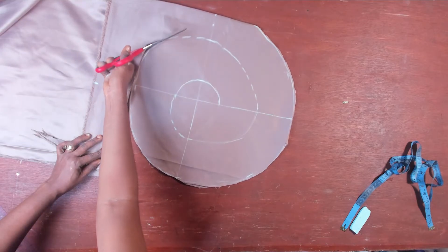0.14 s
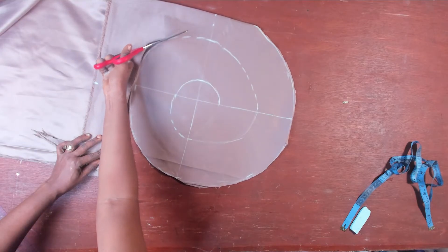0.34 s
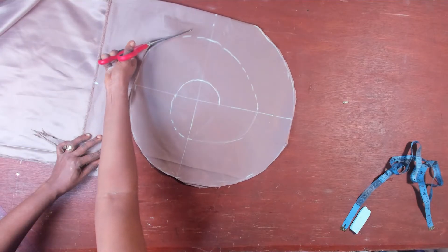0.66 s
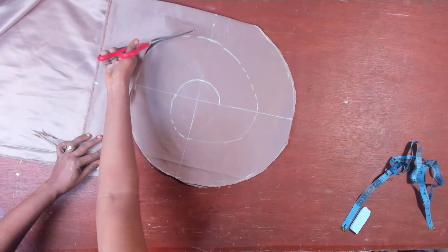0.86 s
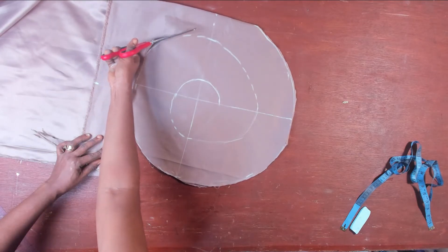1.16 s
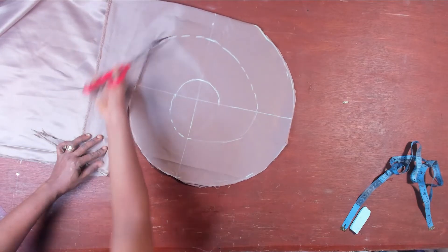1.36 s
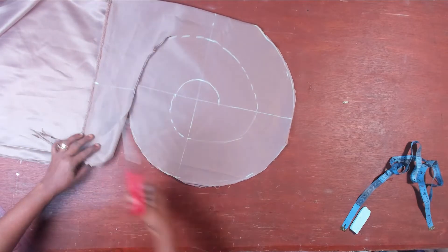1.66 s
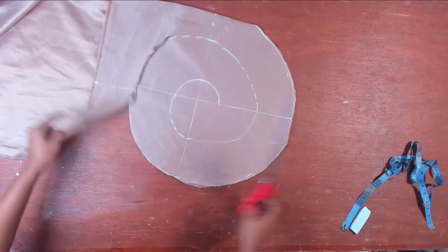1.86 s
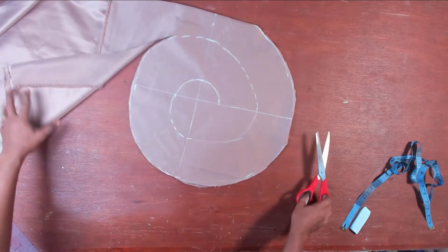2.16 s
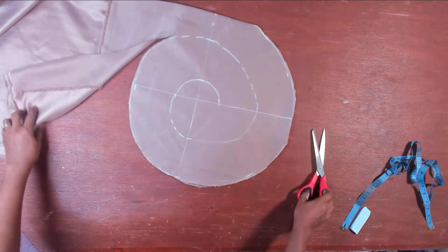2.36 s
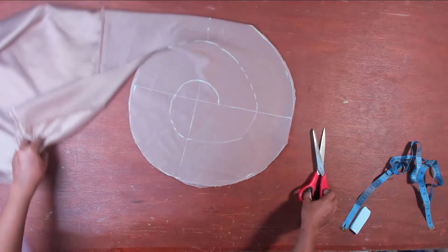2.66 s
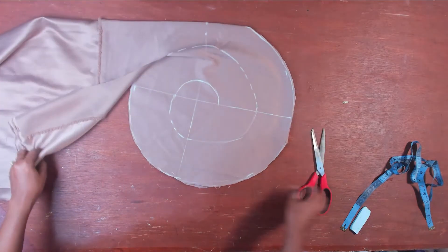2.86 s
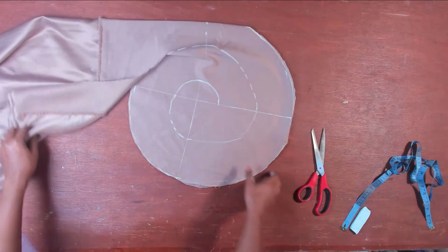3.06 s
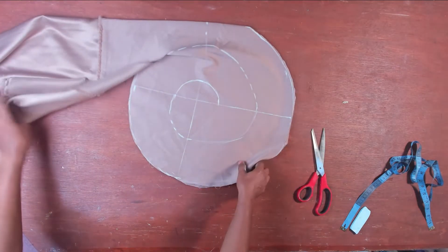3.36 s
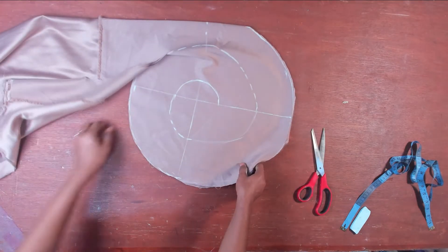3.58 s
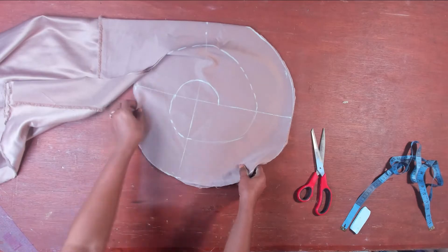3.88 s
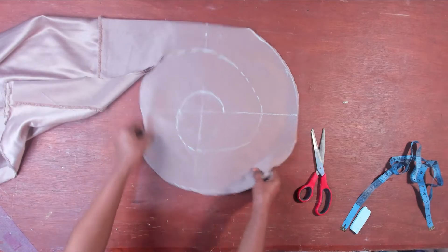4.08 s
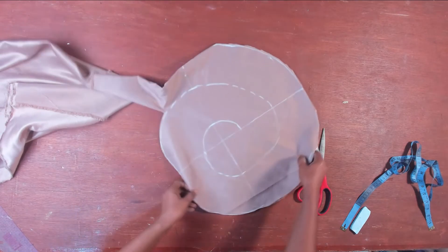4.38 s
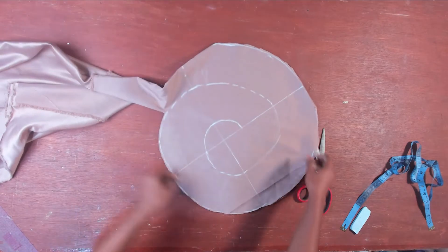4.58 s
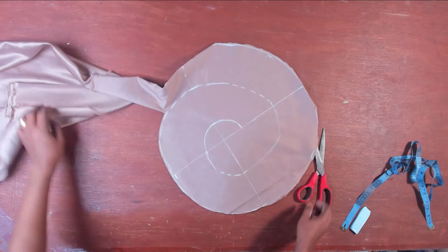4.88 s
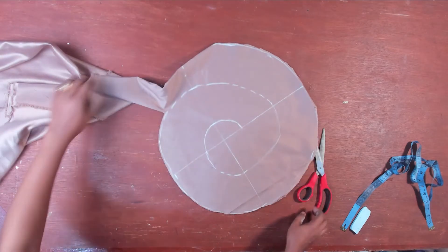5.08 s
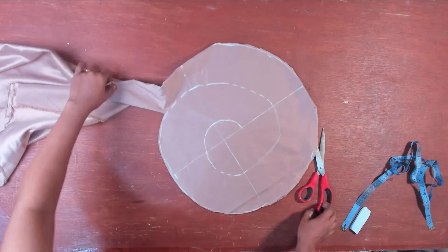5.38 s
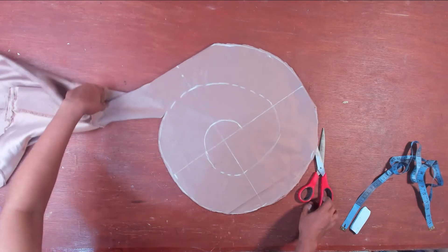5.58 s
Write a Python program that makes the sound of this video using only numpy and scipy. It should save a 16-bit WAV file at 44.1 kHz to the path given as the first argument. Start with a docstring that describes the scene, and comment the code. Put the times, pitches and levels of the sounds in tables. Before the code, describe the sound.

A close, dry mono view of a hollow wooden table in a quiet room with low hum, a very faint electrical buzz and deep table sway. Scissors cut cloth at about 0.05, 0.5 and 0.95 seconds: each snip is a short low woody thump with a gritty, metallic shearing edge, the first knock strongest. Around 1.15 the scissors draw back with a small scrape and hollow ring. At 1.5 a bright cloth hiss starts abruptly, swells and fades within roughly half a second, treble first. At 2.15 to 2.4 the scissors knock and chatter on the wood; at 2.65 to 2.75 comes the loudest cluster of heavy clunks with metal rattle. Small slides follow near 2.9 and 3.1, then a dull solid knock and thump at 3.45. Soft cloth rustles continue to about 4.3, then near silence, with tiny thumps and faint rustling from 5.1 and a light tap at 5.6.

```python
"""Scissors on a hollow wooden table snip three times through cloth and are drawn back; the cloth is swept
aside with a hiss, the scissors are laid down, knock and chatter on the wood, hands shift the cloth.
Random contact impulses excite damped modes of table and blades; friction and cloth are shaped noise.
Thumps are low damped sines, and the handle rings as narrow noise bands of gliding pitch.
A close microphone on the same table picks up its sway; a quiet room hums and faintly buzzes underneath."""
import sys
import numpy as np
from scipy import signal
from scipy.fft import rfft, irfft, next_fast_len
from scipy.io import wavfile
from scipy.ndimage import uniform_filter1d

SR = 44100
rng = np.random.default_rng(int(sys.argv[2]) if len(sys.argv) > 2 else 0)


def file_out(sig):
    """Save sig as 16-bit WAV at sys.argv[1]."""
    # one column per channel
    cols = np.atleast_2d(sig).T
    # limit, then scale
    lim = np.clip(cols, -1, 1)
    pcm = np.round(lim * 32767).astype(np.int16)
    wavfile.write(sys.argv[1], SR, pcm)


N = 252685  # samples

# Table levels are relative: the sources add their own trims. Tilts are in dB per octave.
# Spectrum of the room air: pitch_hz, density_db
AIR_SPECTRUM = [(29, -18), (50, 2.5), (75, -15.5), (125, -7.5), (193, -15.5), (239, -14.5), (458, -21),
                (674, -22), (922, -26.5), (1290, -26.5), (3300, -38.5), (13700, -51.5), (15800, -56)]
# Hum lines of the room: pitch_hz, level_db
HUM_LINES = [(113.0, -63), (156.1, -65), (242.2, -64), (1400, -81.5)]
# Harmonics two to five of the electrical whine: level_db
WHINE_LEVELS = [-87.5, -95, -91.5, -95]
# Slow sway of the table under the arms: time_s, level_db
SWAY_CURVE = [(0.0, -71), (0.06, -39), (0.38, -54.5), (0.7, -51), (0.92, -43), (0.99, -45), (2.57, -45.5),
              (2.62, -47), (2.71, -29.5), (3.25, -55), (3.5, -40), (3.57, -48), (4.88, -49.5), (5.27, -43),
              (5.67, -42), (5.73, -44.5)]
# Jolts that set a higher mode rocking: start_s, hold_s, level_db
ROCK_EVENTS = [(-0, 0.1, -34), (0.59, 0.059, -30), (1.04, .02, -41.5), (2.188, 0.14, -36),
               (2.69, 0.16, -28), (3.453, .02, -41), (5.234, .03, -56)]
# Blades closing on the cloth: start_s, closing_s, push_db, sharpness_db_per_octave,
# grind_db, hardness_db_per_octave, shear_db
SNIP_EVENTS = [(0.029, 0.066, -19, -3, -30, 0, -47), (0.526, 0.043, -19, -1.5, -28, -0.7, -46.5),
               (.938, 0.037, -18, 2, -27, 0.4, -43.5)]
# Scissors landing and chattering: start_s, blow_over_chatter_db, chatter_s, fall_db_per_s, push_db,
# sharpness_db_per_octave, grind_db, hardness_db_per_octave, rasp_db
LANDING_EVENTS = [(2.18, 10.5, 0.072, 248, -30, 8.5, -30, 4.5, -38),
                  (2.275, -15, 0.091, 600, -29, -7, -37, -1.5, -45),
                  (2.394, 6, 0.041, 252, -50, 19, -38.5, .1, -70),
                  (2.65, 1, 0.097, 201, -18.5, 4, -22, 3, -38.5),
                  (3.377, -3, 0.075, 455, -50, 2, -40.5, 2, -67),
                  (3.45, 12.5, 0.067, 218, -28, -1, -34.5, -3.5, -60.5)]
# Scissors and hands sliding on wood: start_s, rise_db_per_s, hold_s, fall_db_per_s, push_db,
# sharpness_db_per_octave, grind_db, hardness_db_per_octave, drag_db
SLIDE_EVENTS = [(0.227, 500, 0.015, 280, -55, -13, -44.5, -4.5, -76),
                (0.727, 330, 0.012, 330, -43, -9, -53.5, -1, -81),
                (1.163, 600, 0.088, 230.5, -42.5, 9, -32, 5, -54),
                (2.149, 2006, 0.034, 600, -24, -2.5, -37.5, -2.5, -64),
                (2.322, 242, 0.055, 400, -36, 5.5, -35.5, 7, -51),
                (2.631, 898, .012, 600, -34, -1, -46.5, 5, -66),
                (2.879, 696, 0.026, 227, -30, .1, -42, -1.7, -63),
                (3.078, 215, .015, 142, -43.5, 1.5, -44, 1.7, -72),
                (5.113, 500, .011, 160, -64, -2.5, -58, 3, -92),
                (5.584, 1200, .03, 130, -52, 2.5, -54, 4, -73)]
# Single contacts with the wood: start_s, level_db, pitch_hz, t60_s, crack_db, treble_db (both against level)
KNOCK_EVENTS = [(0.03, -20, 300, 0.1, -15, -16), (0.061, -8.5, 244, 0.023, -29, -42),
                (0.197, -40.5, 237, 0.037, -6.5, -33), (0.472, -47, 600, 0.02, -17, -28),
                (0.51, -26.5, 294, 0.29, -29, -31), (0.924, -27, 205, 0.054, -21, -34),
                (2.148, -24, 288, 0.05, -29, -27), (2.177, -4, 200, 0.028, -6, -9.5),
                (2.183, -21.5, 200, 0.2, -18, -27), (2.272, -28, 310, 0.071, -25, -9),
                (2.304, -20, 326, 0.063, -27, -10.5), (2.352, -43, 525, 0.04, -30, -24),
                (2.391, -17.5, 520, 0.03, -26, -34), (2.648, 1, 228, 0.026, -14.5, -23),
                (2.69, -5, 266, 0.056, -13, -22), (2.716, -6, 207, 0.035, -24, -43),
                (2.745, -24, 210, 0.048, -21, -57), (3.374, -34, 480, 0.049, -35, -41),
                (3.449, -3.5, 345, 0.019, -34, -36), (5.588, -50, 540, 0.035, -22, -26)]
# Low modes of the table top: pitch_hz, width_hz, level_db
BOOM_MODES = [(47, 6.9, -7), (66, 6.5, 1), (90, 19, -5), (115.7, 8.15, 4), (155.4, 7.9, -9.5),
              (188.8, 10.2, 0.5), (226.5, 48.5, -6.5)]
# Upper modes of the table top: pitch_hz, width_hz, level_db
WOOD_MODES = [(292, 53.4, 2), (382, 52.6, 4), (466, 108, -4), (538, 36.7, 4), (575.5, 27, -1.5),
              (620, 21.5, -1), (692.6, 34.5, -5), (772, 52, -3), (864, 35, -9.5), (947, 39, -6),
              (1079, 61, -9), (1230, 78, -12.5), (1432, 100, -15), (1644, 170, -20), (2084, 190, -23),
              (2333, 18, -17.5), (2550, 220, -29.5), (3070, 530, -35.5), (4040, 1400, -40.5)]
# Soft thumps of a hand or wrist: start_s, level_db, pitch_hz, t60_s
THUMP_EVENTS = [(0.009, -20.5, 73, 0.31), (0.534, -19.5, 71, 0.14), (0.931, -18, 92.5, 0.24),
                (1.428, -44.5, 62, 0.23), (2.091, -33.5, 51, 0.54), (2.139, -19, 49.5, 0.26),
                (2.281, -24, 95.5, 0.22), (3.456, -10.5, 65.6, 0.11), (3.692, -38, 49.4, 0.36),
                (5.1, -50.5, 48.4, 0.22), (5.239, -38, 68.5, 0.35)]
# Modes of the blades: pitch_hz, width_hz, level_db
BLADE_MODES = [(2130, 150, 1), (2300, 140, 14.5), (2660, 125, 13), (3640, 120, -9), (4630, 200, 4),
               (4400, 250, -5), (4620, 430, 12), (5020, 37, 17), (6300, 74, 4), (6460, 71, -1),
               (7570, 75, 2), (8460, 150, -16), (10400, 50, -9), (12630, 60, -20)]
# Spectrum of the shearing edges: pitch_hz, density_db
SHEAR_SPECTRUM = [(1880, -50), (3200, -17.5), (4020, -3.5), (4750, -13.5), (5530, -14), (7040, -17.5),
                  (7630, -14.5), (9200, -20), (11700, -19.5), (15800, -35)]
# Spectrum of sliding friction: pitch_hz, density_db
DRAG_SPECTRUM = [(1180, -25), (2000, -26), (3330, -37), (3990, -6), (5950, -12.5), (9490, -9.5),
                 (12100, -18), (15800, -42)]
# Spectrum of chattering metal: pitch_hz, density_db
RASP_SPECTRUM = [(1180, -3), (2000, 0.5), (2240, -43), (2420, -3), (3930, -8.5), (4750, -10.5), (5950, -9),
                 (9820, -20.5), (15800, -29)]
# Hollow handle ringing as it slides or rocks: start_s, hold_s, start_db, end_db, start_hz, end_hz
HANDLE_EVENTS = [(1.15, 0.088, -39, -49.5, 1325, 1318), (1.19, 0.062, -37, -29, 360, 345.5),
                 (2.274, 0.087, -33, -45.5, 1490, 1493), (3.377, 0.07, -45.5, -60, 2294, 2340),
                 (3.378, 0.059, -28.5, -45, 513, 536), (3.377, 0.039, -58, -61, 2865, 2940),
                 (3.486, 0.098, -43, -59, 577, 535)]
# Spectrum of the swept cloth: pitch_hz, density_db
HISS_SPECTRUM = [(350, -45.5), (600, -17.5), (727, -24), (1110, -9.5), (1360, -27), (1590, -7), (1790, -13),
                 (2560, -8), (7440, -1), (12000, -3.5), (15800, -10)]
# Cloth lifted and turned: start_s, hold_s, broad_db, bright_db, bright_hz
RUSTLE_EVENTS = [(2.397, .23, -58, -62, 5900), (2.891, .04, -71, -67.5, 6560),
                 (3.079, .03, -64, -77.5, 5130), (3.49, 0.085, -60.5, -61, 5500),
                 (3.788, .04, -62.5, -63.5, 4550), (3.881, .03, -72.5, -68, 4900),
                 (4.01, .025, -68, -60, 5370), (4.123, 0.022, -72, -68.5, 4800), (4.2, .13, -65, -79, 5000),
                 (4.717, .025, -83, -81, 5200), (5.25, .04, -84, -76, 4900),
                 (5.347, 0.021, -76, -75.5, 5200), (5.434, .12, -72, -75, 5000)]
# Spectrum of the rustling cloth: pitch_hz, density_db
CLOTH_SPECTRUM = [(410, -31), (700, 5), (945, 1.5), (1080, 4.5), (1360, 4.5), (3100, -6.5), (4700, -6),
                  (7040, -7.5), (9140, -11.5), (15800, -13)]

AIR_DB = -54
BUZZ_PER_S, BUZZ_HISS_DB, WHINE_HZ = 105.6, -81, 2683
WHINE_DUTY, BUZZ_DUTY = 0.33, 0.25  # fractions of each buzz cycle
SWAY_HZ, ROCK_HZ = 26.5, 35.7
# Envelope rates in dB per s; a negative sag builds through the hold
ROCK_RISE, ROCK_FALL = 260, 112
SNIP_RISE, PUSH_SAG, PUSH_FALL = 700, 68, 247
GRIND_SAG, GRIND_FALL, SHEAR_SAG, SHEAR_FALL = -38, 226, -73, 333
LANDING_RISE, BLOW_FALL, CHATTER_SAG, RASP_SAG = 4900, 460, 36, 120
SLIDE_SAG = 91
HANDLE_RISE, HANDLE_FALL = 4200, 530
RUSTLE_RISE, RUSTLE_SAG, RUSTLE_FALL, BRIGHT_RISE, BRIGHT_FALL = 74, 33, 150, 560, 220
SOFTENING = 16  # dB per octave of hardness lost per s as a contact lets go
RASP_FASTER = 1.5  # fall of the rasp relative to that of the grind
SWEEP_S, SWEEP_SWELL_S = 1.499, 0.013
SWEEP_DB, SWEEP_TREBLE_DB, SWEEP_SPLIT_HZ = -28, 3.9, 9800
SWEEP_RISE, SWEEP_SWELL = 1700, 450  # dB per s
# Loss in dB after one second, its power of time, and extra treble loss in dB per s
SWEEP_LOSS_DB, SWEEP_CURVE, TREBLE_LOSS = 301, 1.69, 79
CUTOFF_HZ = 16120


def amp(db):
    """Decibel law: level to amplitude ratio."""
    return 10 ** (np.asarray(db) / 20)


def rms_one(x):
    """Normalisation to unit rms."""
    return x / np.sqrt(np.mean(x ** 2) + 1e-20)


def grains(per_s, spread_db):
    """Impulse noise: random clicks of uneven size and sign; rms 1."""
    sizes = amp(spread_db * np.minimum(rng.exponential(1, N), 4))
    signs = rng.choice([-1, 1], N)
    present = rng.random(N) < per_s / SR
    return rms_one(sizes * signs * present)


def drift(rate):
    """Slow random fluctuation: noise through a double real pole; rms 1."""
    r = np.exp(-2 * np.pi * rate / SR)
    noise = rng.standard_normal(N + SR)
    return rms_one(signal.lfilter([1], [1, -2 * r, r * r], noise)[SR:])  # first second lets it settle


def low_pass(x, hz):
    """Fourth-order low-pass filtering."""
    return signal.sosfilt(signal.butter(4, hz, fs=SR, output="sos"), x)


def band_pass(x, low_hz, high_hz):
    """Band limitation by Butterworth filtering."""
    return signal.sosfilt(signal.butter(3, [low_hz, high_hz], "band", fs=SR, output="sos"), x)


def colour(x, spectrum):
    """Spectral shaping: 24 dB/octave steeper below the first point, flat above the last; unit rms gain."""
    size = next_fast_len(N + 4096)
    hz = np.arange(size // 2 + 1) * SR / size + 1
    at, db = np.transpose(spectrum)
    octaves_below = np.maximum(np.log2(at[0] / hz), 0)
    shape = amp(np.interp(np.log(hz), np.log(at), db) - 24 * octaves_below)
    return irfft(rfft(x, size) * rms_one(shape), size)[:N]


def resonate(x, hz, width_hz):
    """Damped resonance: a two-pole filter with about unit gain at its peak."""
    r = np.exp(-np.pi * width_hz / SR)
    feed = np.array([1, 0, -1]) * (1 - r * r) / 2
    return signal.lfilter(feed, [1, -2 * r * np.cos(2 * np.pi * hz / SR), r * r], x + 1e-18)


def body(x, modes, tilt_db=0, pivot_hz=1000):
    """Modal superposition with alternating signs; harder contact tilts the drive to upper modes."""
    power, out = 0, 0
    for k, (hz, width_hz, db) in enumerate(modes):
        drive = x * amp(tilt_db * np.log2(hz / pivot_hz))
        out = out + (-1) ** k * amp(db) * resonate(drive, hz, width_hz)
        power += amp(2 * db) * np.pi * width_hz / SR
    return out / np.sqrt(power)


def moving_band(centre_hz, width_hz):
    """Amplitude modulation: low-passed noise on a carrier that follows a centre curve; rms 1."""
    band = low_pass(rng.standard_normal(N), width_hz / 2)
    return rms_one(band * np.sin(2 * np.pi * np.cumsum(centre_hz) / SR))


def strokes(s, db, rise, hold, sag, fall):
    """Exponential envelopes, one per event: climb to s, sag through the hold, fall; rates in dB per s."""
    s, db, rise, hold, sag, fall = (np.reshape(v, (-1, 1)) for v in (s, db, rise, hold, sag, fall))
    t = np.arange(N) / SR - s
    before = np.abs(rise) * np.maximum(-t, 0)
    during = sag * np.clip(t, 0, hold)
    after = np.abs(fall) * np.maximum(t - hold, 0)
    return amp(db - np.minimum(before + during + after, 150))


def prevailing(envelopes, values):
    """Weighted mean: at each moment the strongest events count most."""
    weighted = np.reshape(values, (len(envelopes), -1)) * envelopes
    return weighted.sum(axis=0) / envelopes.sum(axis=0)


def wobble(hz):
    """Random phase and amplitude modulation of a sine, giving a slightly uneven sway."""
    phase = hz * np.arange(N) / SR + rng.random() + 0.026 * drift(16.6)
    return amp(2.4 * drift(6.8)) * np.sqrt(2) * np.sin(2 * np.pi * phase)


def room_tone():
    """Stationary background: shaped air noise and faint sinusoidal hum lines."""
    t = np.arange(N) / SR
    hum = sum(amp(db + 2.0) * np.sin(2 * np.pi * (hz * t + rng.random())) for hz, db in HUM_LINES)
    air = colour(rng.standard_normal(N), AIR_SPECTRUM)
    return amp(AIR_DB - 2.5 + 0.5 * drift(7.5)) * air + amp(2.0 * drift(1.27)) * hum


def buzz():
    """Periodic gating of an electrical whine's harmonics and, more briefly, of a thin hiss."""
    t = np.arange(N) / SR
    cycle = (BUZZ_PER_S * t + rng.random()) % 1
    whine_gate = rms_one(np.sin(np.pi * np.minimum(cycle / WHINE_DUTY, 1)))
    hiss_gate = rms_one(np.sin(np.pi * np.minimum(cycle / BUZZ_DUTY, 1)))
    whine = 0
    for k, db in enumerate(WHINE_LEVELS, 2):
        whine = whine + amp(db) * np.sqrt(2) * np.sin(2 * np.pi * (k * WHINE_HZ * t + rng.random()))
    hiss = amp(BUZZ_HISS_DB) * band_pass(rng.standard_normal(N), 6000, 16000)
    return whine_gate * whine + hiss_gate * hiss


def sway():
    """Rigid-body motion: the whole table sways at its lowest mode and rocks at the next after jolts."""
    s, hold, db = np.transpose(ROCK_EVENTS)
    slow = amp(np.interp(np.arange(N) / SR, *np.transpose(SWAY_CURVE)))
    rocking = strokes(s, db, ROCK_RISE, hold, 0, ROCK_FALL).sum(axis=0)
    return slow * wobble(SWAY_HZ) + rocking * wobble(ROCK_HZ)


def landing(db, sag, fall):
    """Impact and rebound: a sudden blow added to a stretch of chatter."""
    s, blow_db, chatter = np.transpose(LANDING_EVENTS)[:3]
    chattering = strokes(s, db, LANDING_RISE, chatter, sag, fall)
    return chattering + strokes(s, db + blow_db, LANDING_RISE, 0, 0, BLOW_FALL)


def work():
    """Contact excitation: push and grind envelopes, with their tilts, of snips, landings and slides."""
    s, hold, push, sharp, grind, hard, _ = np.transpose(SNIP_EVENTS)
    hit, _, chatter, fall, land_push, land_sharp, land_grind, land_hard, _ = np.transpose(LANDING_EVENTS)
    at, rise, stay, fade, slide_push, slide_sharp, slide_grind, slide_hard, _ = np.transpose(SLIDE_EVENTS)
    pushes = np.vstack([strokes(s, push, SNIP_RISE, hold, PUSH_SAG, PUSH_FALL),
                        landing(land_push, CHATTER_SAG, fall),
                        strokes(at, slide_push, rise, stay, SLIDE_SAG, fade)])
    grinds = np.vstack([strokes(s, grind, SNIP_RISE, hold, GRIND_SAG, GRIND_FALL),
                        landing(land_grind, CHATTER_SAG, fall),
                        strokes(at, slide_grind, rise, stay, SLIDE_SAG, fade)])
    release_s = np.r_[s + hold, hit + chatter / 2, at + stay / 2][:, None]
    since = np.arange(N) / SR - release_s
    hardness = np.r_[hard, land_hard, slide_hard][:, None] - SOFTENING * np.clip(since, 0, .3)
    sharpness = np.r_[sharp, land_sharp, slide_sharp]
    return (pushes.sum(axis=0), prevailing(pushes, sharpness),
            grinds.sum(axis=0), prevailing(grinds, hardness))


def table():
    """Modal excitation: soft pushes drive low modes, finer slips upper ones; each knock strikes both."""
    push, sharpness, grind, hardness = work()
    blows = np.zeros(N)
    for s, db, *_ in KNOCK_EVENTS:
        blows[round(s * SR)] = amp(db)
    pushes = push * grains(500, 1.96) + amp(5.0) * blows
    slips = grind * amp(1.9 * drift(32)) * grains(3000, 2.65) + amp(10.0) * blows
    boom = body(band_pass(pushes, 36, 330), BOOM_MODES, sharpness, pivot_hz=118.0)
    wood = body(band_pass(slips, 183, 6100), WOOD_MODES, hardness, pivot_hz=543)
    return amp(-1.5) * boom + amp(-0.83) * wood


def thumps():
    """Soft impact: flesh presses slowly, so only one low mode swells and dies."""
    out, t = np.zeros(N), np.arange(SR // 2) / SR
    for s, db, hz, t60 in THUMP_EVENTS:
        at = round(s * SR)
        swell = 1 - np.exp(-t / 0.0072)
        decay = amp(db + 4.0 - 60 * t / max(t60, .05))
        out[at:at + len(t)] += (swell * decay * np.sin(2 * np.pi * hz * t))[:N - at]
    return out


def edges():
    """Fracture noise: threads part one after another, in uneven runs, and set the blades ringing."""
    s, hold, *_, shear_db = np.transpose(SNIP_EVENTS)
    closing = strokes(s, shear_db, SNIP_RISE, hold, SHEAR_SAG, SHEAR_FALL).sum(axis=0)
    threads = closing * amp(2.5 * drift(68)) * grains(12000, 4.2)
    ringing = body(band_pass(threads, 2000, 14300), BLADE_MODES)
    return amp(-3.0) * colour(threads, SHEAR_SPECTRUM) + amp(-2.5) * ringing


def knocks():
    """Impact radiation: each contact is heard directly as a damped knock and a short crack."""
    length = 4096  # samples
    out, t = np.zeros(N), np.arange(length) / SR
    noise = rng.standard_normal((len(KNOCK_EVENTS), length))
    cracks, ticks = band_pass(noise, 930, 5100), band_pass(noise, 4300, 10000)
    soft = 1 - np.exp(-t / 0.0007)  # the contact takes a moment to build
    for (s, db, hz, t60, crack_db, tick_db), crack, tick in zip(KNOCK_EVENTS, cracks, ticks):
        at = round(s * SR)
        knock = soft * amp(db - 2.5 - 60 * t / max(t60, .005)) * np.sin(2 * np.pi * hz * t)
        snap = amp(db + crack_db + 1 - 60 * t / 0.014) * crack
        treble = amp(db + tick_db - 3 - 60 * t / 0.021) * tick
        out[at:at + length] += (knock + snap + treble)[:N - at]
    return out


def friction():
    """Frictional noise: metal rasps as it chatters and drags as it slides."""
    s, rise, hold, fall, *_, drag_db = np.transpose(SLIDE_EVENTS)
    drag = strokes(s, drag_db, rise, hold, RASP_SAG, fall).sum(axis=0)
    _, _, _, land_fall, *_, rasp_db = np.transpose(LANDING_EVENTS)
    rasp = landing(rasp_db, RASP_SAG, RASP_FASTER * land_fall).sum(axis=0)
    dragging = colour(drag * grains(10000, 1.8), DRAG_SPECTRUM)
    return dragging + colour(rasp * grains(12000, 1.06), RASP_SPECTRUM)


def handle():
    """Narrow-band resonance: several uneven rings fade or grow as it slides or rocks, wider if higher."""
    out, t = 0, np.arange(N) / SR
    for s, hold, db, end_db, from_hz, to_hz in HANDLE_EVENTS:
        centre_hz = np.interp(t, [s, s + hold], [from_hz, to_hz])
        width_hz = 0.27 * (from_hz / 1000) ** 1.28 * 1000
        ring = moving_band(centre_hz, width_hz)
        levelled = ring / np.sqrt(uniform_filter1d(ring ** 2, size=500) + 0.071)  # tames the noise swings
        gain = strokes(s, db, HANDLE_RISE, hold, (db - end_db) / hold, HANDLE_FALL)[0]
        out = out + gain * amp(2.16 * drift(53)) * levelled
    return out


def sweep():
    """Sliding noise: hiss sets in at once, swells, then fades ever faster as cloth slows, treble first."""
    t = np.arange(N) / SR - SWEEP_S
    elapsed = np.maximum(t, 0)
    rise_db = SWEEP_RISE * np.minimum(t, 0) + SWEEP_SWELL * np.minimum(t - SWEEP_SWELL_S, 0)
    gain = amp(SWEEP_DB + rise_db - SWEEP_LOSS_DB * elapsed ** SWEEP_CURVE)
    treble_gain = gain * amp(SWEEP_TREBLE_DB - TREBLE_LOSS * elapsed)
    low = low_pass(colour(gain * grains(18000, 1.8), HISS_SPECTRUM), SWEEP_SPLIT_HZ)
    high = colour(treble_gain * grains(9000, 4.5), HISS_SPECTRUM)
    return low + band_pass(high, SWEEP_SPLIT_HZ, .45 * SR)


def rustle():
    """Textile friction: weave over weave gives broad hiss, a moving bright band and a fainter one above."""
    s, hold, db, bright_db, hz = np.transpose(RUSTLE_EVENTS)
    broad = strokes(s, db, RUSTLE_RISE, hold, RUSTLE_SAG, RUSTLE_FALL)
    narrow = strokes(s, bright_db, BRIGHT_RISE, hold, RUSTLE_SAG, BRIGHT_FALL)
    centre_hz = prevailing(narrow, hz)
    bright = moving_band(centre_hz, 1270) + amp(-2.5) * moving_band(np.full(N, 9100.), 2200)
    hiss = broad.sum(axis=0) * colour(grains(15000, 2.5), CLOTH_SPECTRUM)
    return hiss + narrow.sum(axis=0) * amp(-4 + 2.4 * drift(60)) * bright


def scene():
    """Linear superposition of all sources in one channel."""
    scissors = edges() + knocks() + friction() + handle()
    cloth = sweep() + rustle()
    background = room_tone() + buzz() + sway()
    return (background + table() + thumps() + scissors + cloth)[None]


def record(dry):
    """Saturation and band limitation: the loudest peaks are rounded, the top is cut."""
    rounded = .62 * np.tanh(dry / .62)
    return signal.sosfilt(signal.cheby2(20, 60, CUTOFF_HZ, fs=SR, output="sos"), rounded)


dry = scene()
out = record(dry)
file_out(out)
```